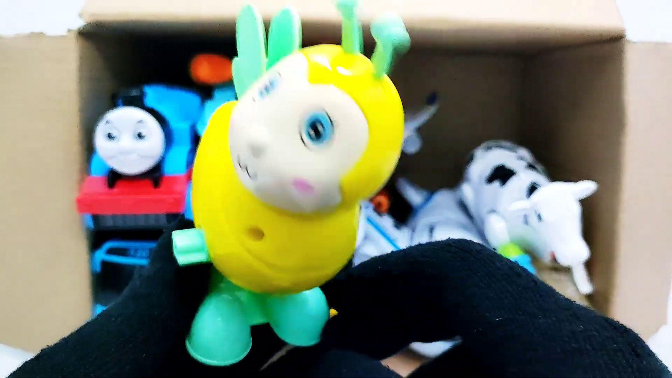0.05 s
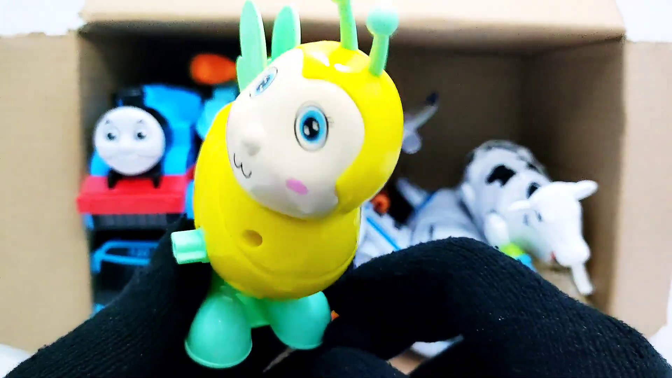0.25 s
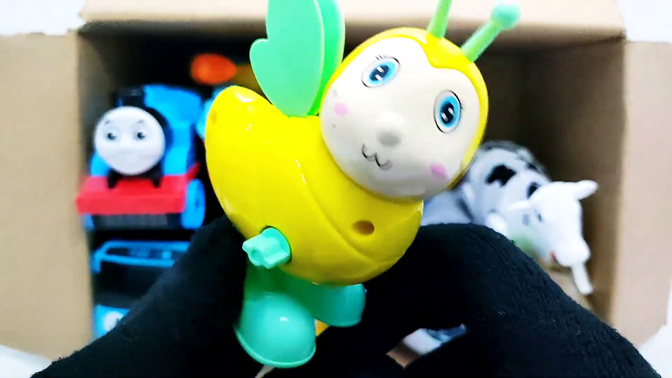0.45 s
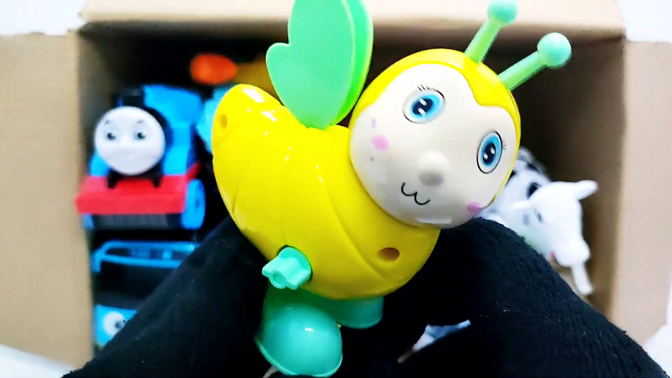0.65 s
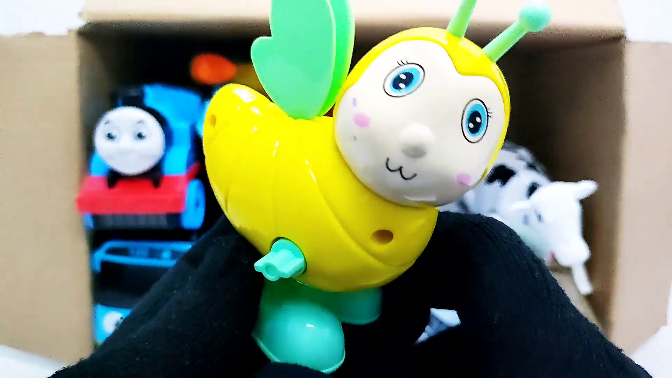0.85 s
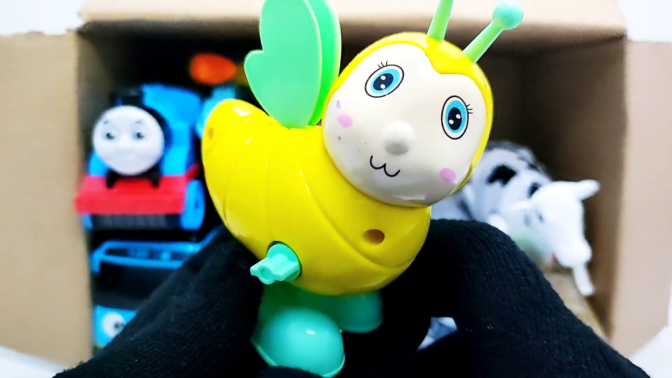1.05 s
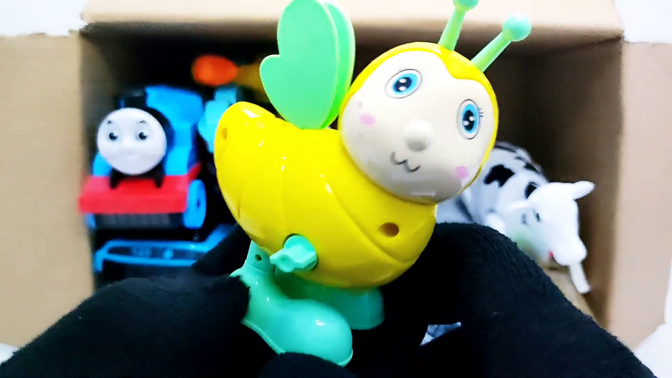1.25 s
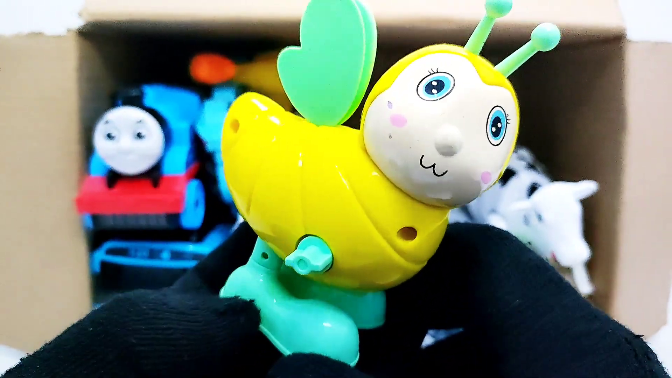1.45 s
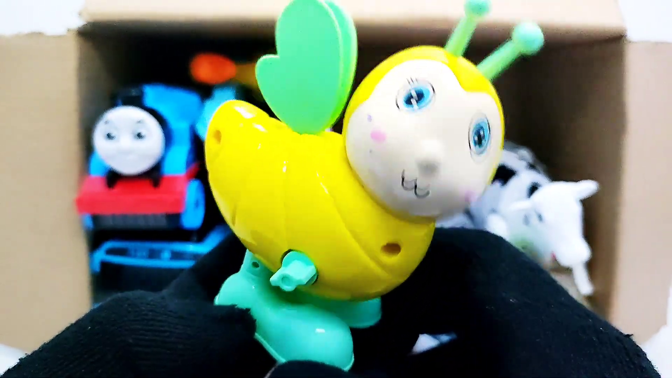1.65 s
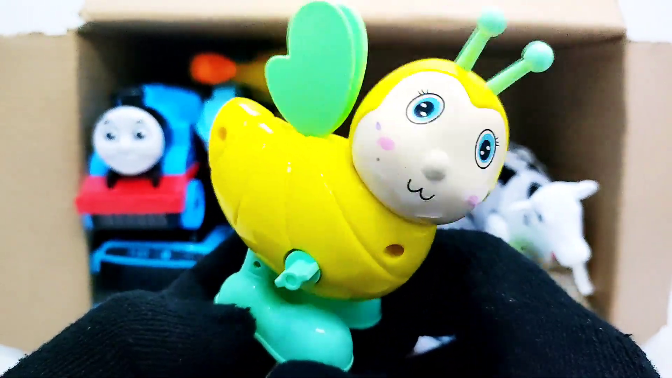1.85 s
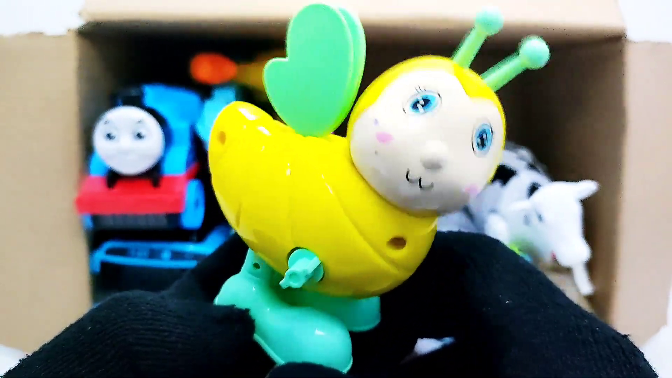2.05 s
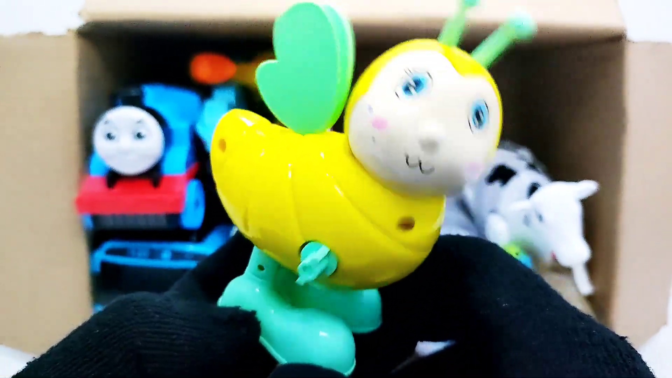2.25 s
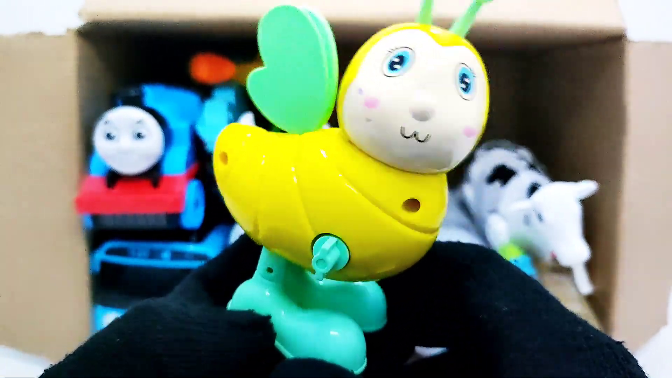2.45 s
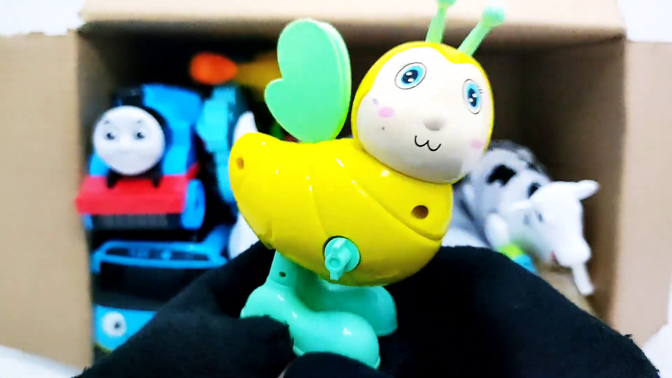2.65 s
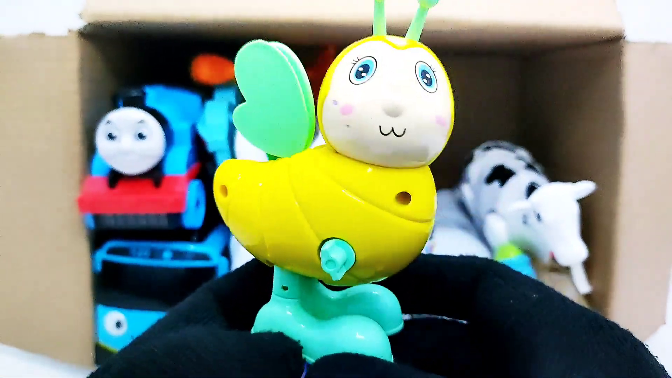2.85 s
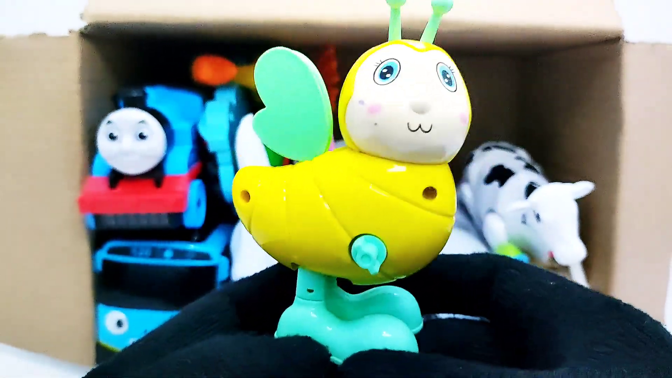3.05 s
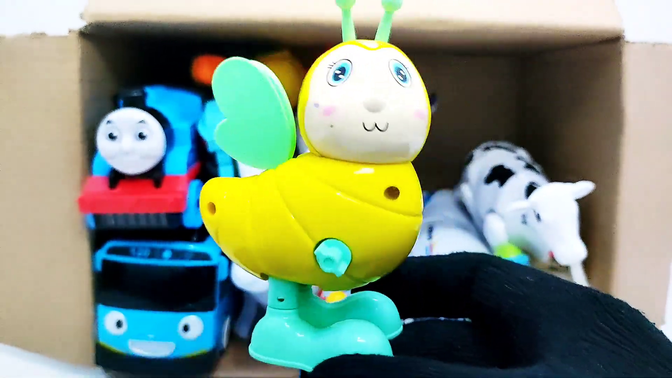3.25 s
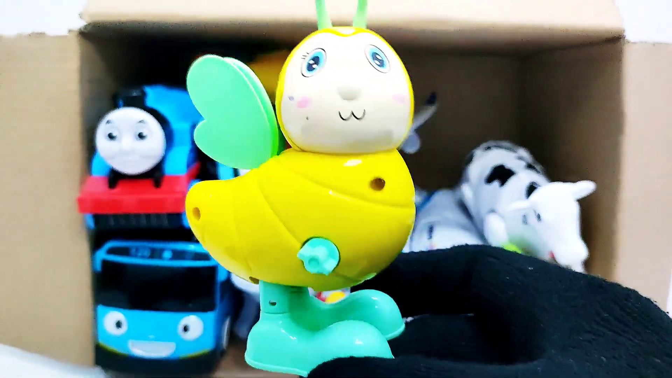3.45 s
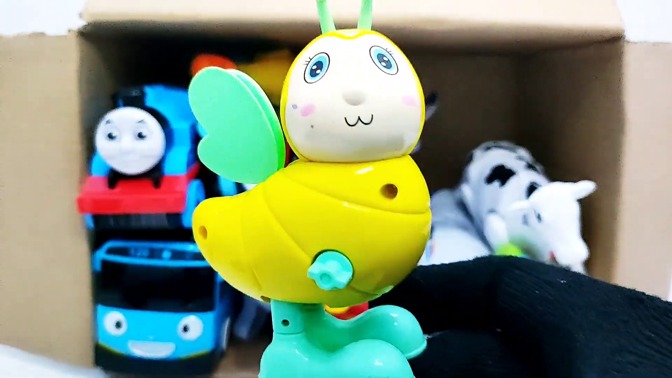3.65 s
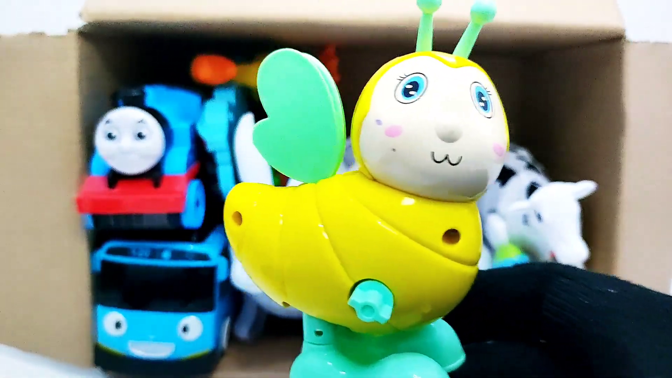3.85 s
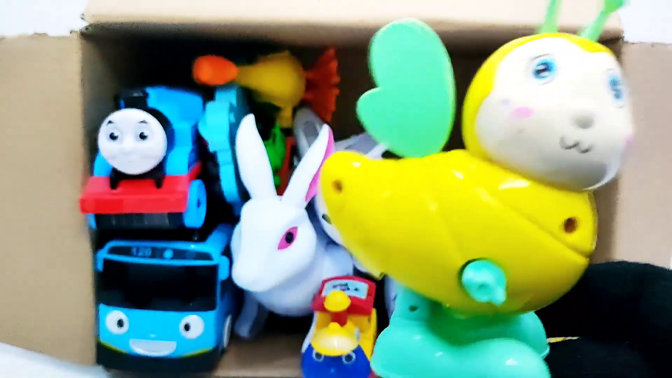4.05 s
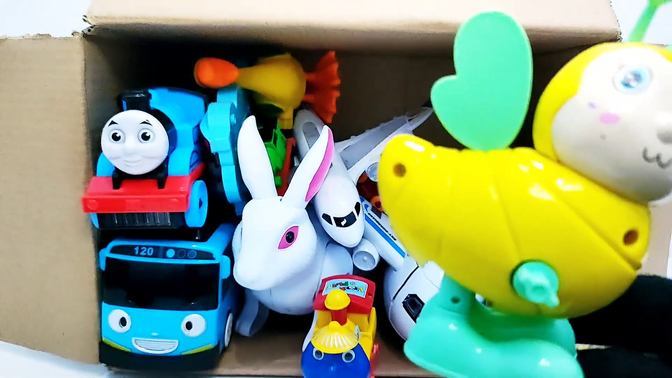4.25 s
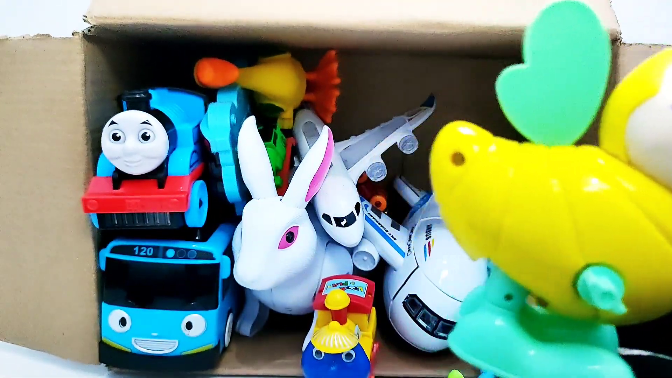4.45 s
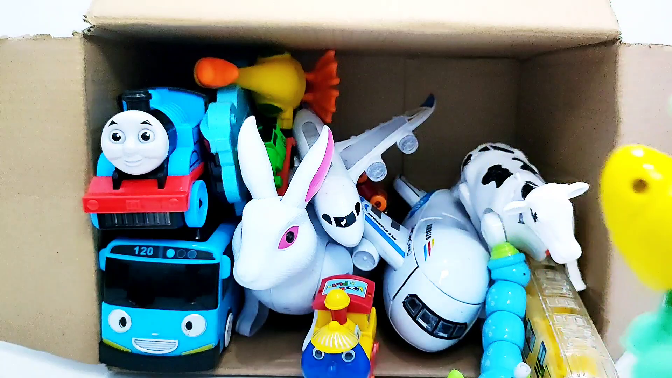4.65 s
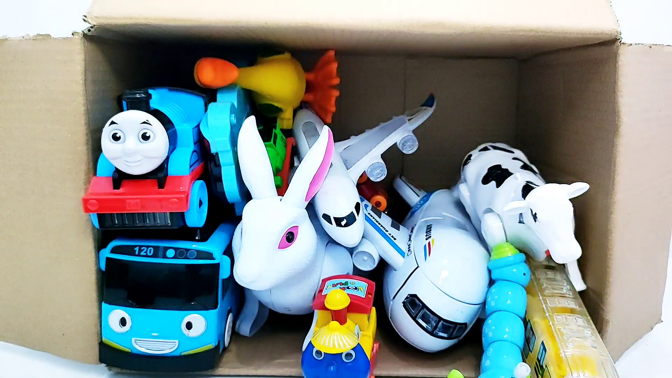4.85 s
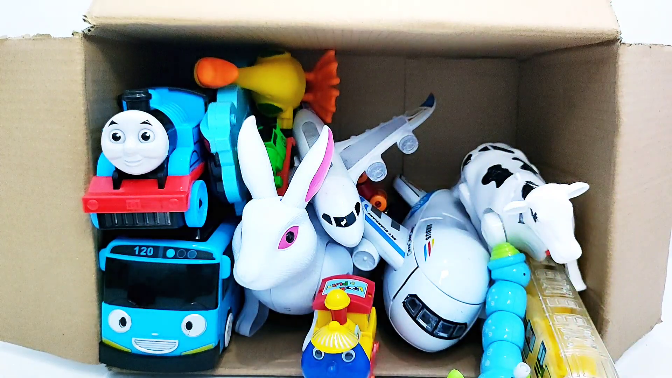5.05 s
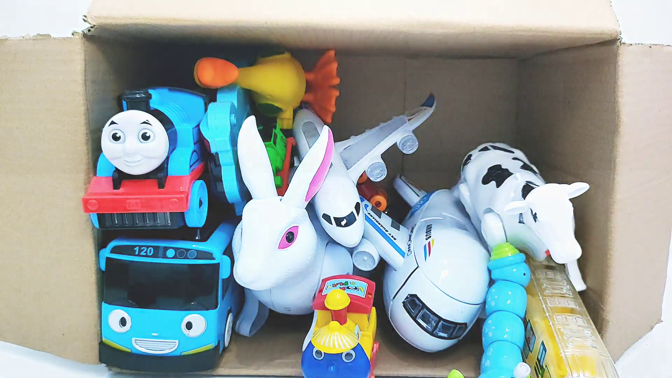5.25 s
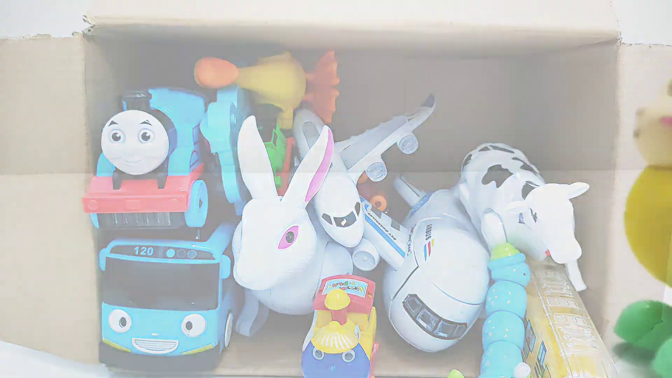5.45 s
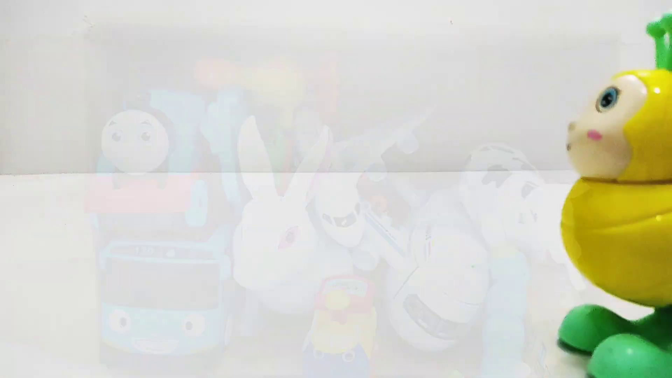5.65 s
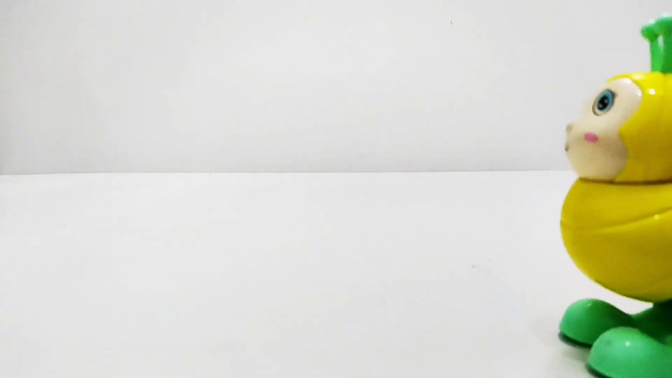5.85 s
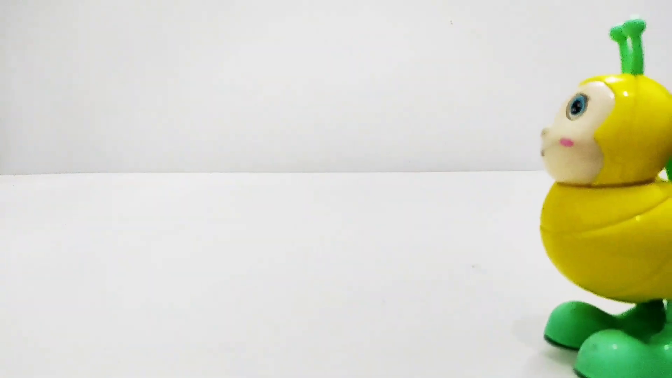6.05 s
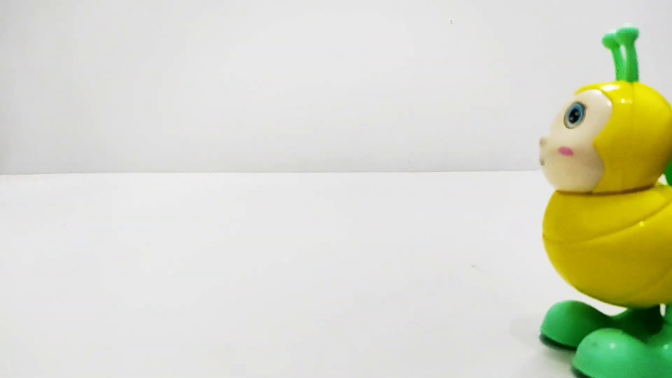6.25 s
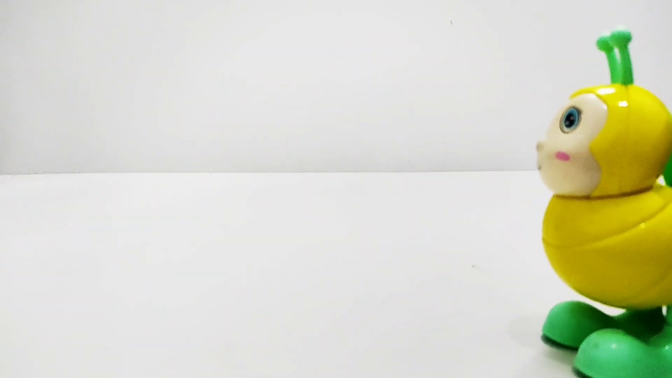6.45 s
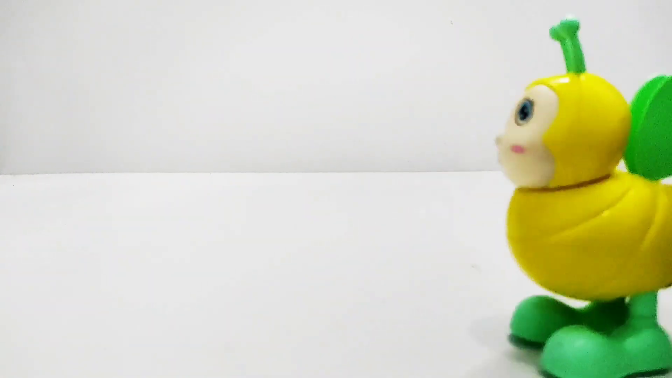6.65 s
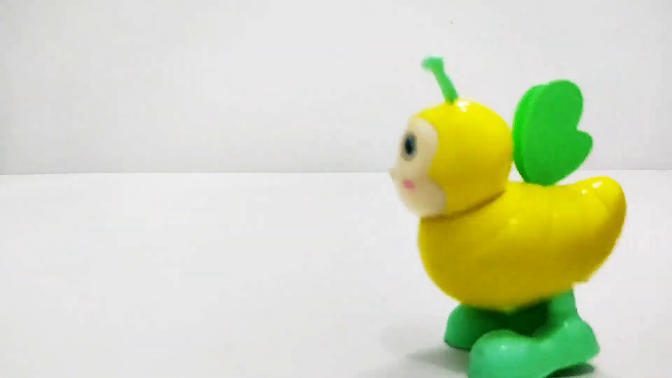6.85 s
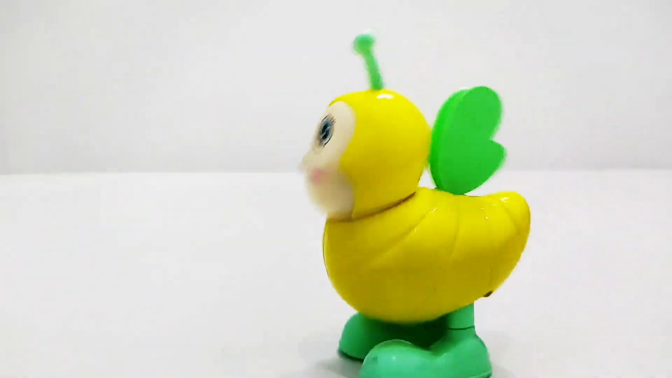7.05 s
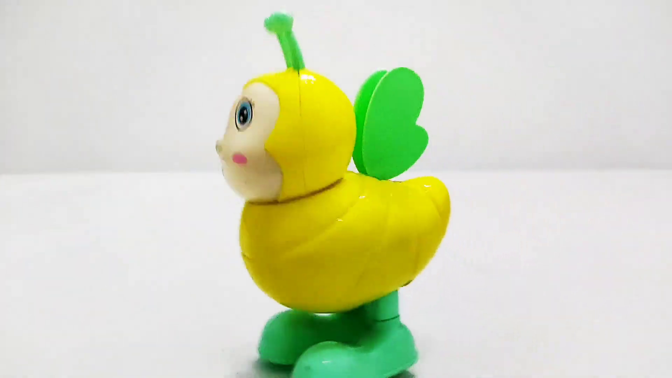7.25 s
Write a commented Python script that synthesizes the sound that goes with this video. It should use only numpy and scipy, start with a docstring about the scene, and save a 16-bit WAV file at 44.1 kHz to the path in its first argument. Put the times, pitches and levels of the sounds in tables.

```python
"""A low-humming room, then a second one fading in quieter, its air swelling at the end: a plastic wind-up toy.
Winding: paired ratchet ticks, each a burst of contacts ringing the shell modes, with glove grains.
Setting down: faint touches, rustling grains and a narrow-band foot slide.
Walking: cam and leg clacks on the shell, gear rasps over table rumble, feet as gritty scuffs plus board thuds.
Hits echo through diffuse noise tails; coloured noise makes the room beds."""
import sys
import numpy as np
from scipy import signal
from scipy.fft import rfft, irfft, next_fast_len
from scipy.io import wavfile
from scipy.ndimage import uniform_filter1d

SR = 44100
rng = np.random.default_rng(int(sys.argv[2]) if len(sys.argv) > 2 else 0)


def log_audio(samples):
    """Write samples as a 16-bit WAV file to the path given in sys.argv[1]."""
    # one column per channel
    frames = np.atleast_2d(samples).T
    # limit to full scale, then quantise
    limited = np.clip(frames, -1, 1)
    pcm = np.round(limited * 32767).astype(np.int16)
    wavfile.write(sys.argv[1], SR, pcm)


N = 321925
LEAD_SAMPLES = 4410   # kept before time zero so an earlier tick still echoes

# ratchet, first and second tick of a pair in turn:
# (time [s], peak [dB], favoured ring [Hz], high rings [dB], room send [dB])
RATCHET_TICKS = [(-0.042, -3.5, 4400, 0.5, -8.5), (0.0164, -6, 4420, 2.5, -10.5),
                 (0.1051, -7.5, 6260, -3.5, -6.5), (0.1845, -4, 4530, 2, -12.5),
                 (0.2757, -4, 4200, -1, -8.5), (0.3388, -8, 4280, 1, -10), (0.4394, -4, 4240, -1.5, -8),
                 (0.506, -6, 5540, 2, -14.5), (0.601, -5, 5500, 1.5, -9), (0.6717, -5.5, 4530, 2, -13),
                 (0.7896, -4.5, 4480, -0.5, -7.5), (0.845, -4.5, 4000, 5.5, -15.5),
                 (1.6192, -4.5, 4150, 2.5, -10.5), (1.6697, -5.5, 4420, 0, -10.5),
                 (1.7863, -3, 5530, -1.5, -8.5), (1.8523, -4, 4750, 4.5, -11.5), (1.9739, -4, 4230, 3, -9),
                 (2.0381, -5, 4500, 3.5, -13), (2.134, -2, 4100, 2.5, -8.5), (2.2034, -4, 4050, 5.5, -13.5),
                 (2.317, -2, 4770, -1.5, -8.5), (2.385, -6, 4900, 6.5, -11), (2.5006, -3, 5100, -0.2, -8.5),
                 (2.5684, -8, 5500, 4, -10), (2.6848, -5, 4900, 1, -8.5), (2.7548, -4.5, 5120, 1, -14),
                 (2.875, -4, 3910, 2.5, -7.5), (2.9432, -5, 4560, 6.5, -14.5),
                 (3.0639, -1, 4770, 1.5, -9.5), (3.1472, -7.5, 5200, 1.5, -10),
                 (3.271, -3.5, 4260, 0.5, -11), (3.33, -12.5, 4300, 3.5, -5.5), (3.467, -4.5, 4240, 1, -10),
                 (3.5257, -7, 5380, 3.5, -11), (3.6909, -6.5, 4740, 3.5, -10.5),
                 (3.7525, -7, 4640, 3.5, -13)]
# first and second tick: (low rings [dB], left-right [dB], bounces [dB])
TICK_PAIR = [(1.5, 2, -4), (0, 2.5, 2.5)]
# faint pawl after-ticks: (time [s], peak [dB], favoured ring [Hz])
PAWL_TICKS = [(0.1124, -21, 4120), (0.9395, -26, 4440), (3.298, -32, 4080), (3.4949, -16.5, 3140)]
# cam and legs, walking: (time [s], peak [dB], favoured ring [Hz])
LEG_CLACKS = [(6.689, -2.5, 3470), (6.735, -4, 2400), (6.785, -21, 4000), (6.791, -15.5, 2030),
              (6.821, -4.5, 1980), (6.861, -1, 5530), (6.908, -19, 2020), (6.922, -30, 1590),
              (6.946, 1, 4140), (6.989, -1.5, 3860), (7.03, -11, 2650), (7.035, -10, 2400),
              (7.052, -4, 1940), (7.106, -3.5, 3730), (7.153, -7, 3530), (7.157, -10, 5250),
              (7.177, -1.5, 4200), (7.233, -6.5, 3800), (7.236, -9, 3560), (7.278, -16, 2120)]
# toy touching the table: (time [s], peak [dB], favoured ring [Hz])
TABLE_TOUCHES = [(5.329, -44.5, 2560), (5.649, -45, 1970), (5.667, -39, 2900), (5.683, -33.5, 2160),
                 (5.7119, -37, 1980), (5.751, -39, 2290), (5.8609, -37, 2310), (5.894, -37.5, 2480),
                 (5.933, -37.5, 2260), (5.9555, -42, 3430), (6.225, -44, 2344), (6.24, -39, 2080),
                 (6.338, -55.5, 3530), (6.419, -56, 2300)]
# character of each hit kind:
# (low rings [dB], high rings [dB], left-right [dB], bounces [dB], room send [dB])
PAWL_CHARACTER = (6, -4, 2, 2, -4.5)
CLACK_CHARACTER = (2, 2.6, -0.8, 0.5, -12.5)
TOUCH_CHARACTER = (6.5, -1, -2, 4, -9)
# slip, snap and dying bounces in one hit: (nominal delay [s], relative level [dB])
HIT_CONTACTS = [(0, -14.5), (.0008, -4.5), (.0019, -8), (.0036, -10), (.0052, -16), (.008, -24)]
# shell modes: (nominal frequency [Hz], level in glove [dB], level on table [dB],
# t60 before contact damping [s])
SHELL_MODES = [(715, -22, -24, 0.01), (1134, -22, -11, 0.02), (1650, -13, -18, 0.0046),
               (1936, -7, -7.5, 0.02), (2320, -14, 1.5, 0.01), (2705, -8, -9, 0.034),
               (3238, -5.5, 4.5, 0.0085), (3837, 0.5, 11.5, 0.0026), (4197, -2.5, -4, 0.024),
               (4680, -0.5, 0.5, 0.01), (5100, -6, -27, 0.0094), (5563, -4.5, 1.5, 0.018),
               (6000, -28, -22, 0.003), (6835, -14.5, -9.5, 0.011), (8030, -16, -21.5, 0.0036),
               (9080, -19.5, -20, 0.018), (10000, -14, -12.5, 0.0039), (11100, -15.5, -13.5, 0.0082),
               (13440, -16.5, -19, 0.012), (15100, -26, -24, 0.01), (14400, -34, -29, .006)]
LOW_RINGS_HZ, HIGH_RINGS_HZ = 2600, 6500
# gear train: (time [s], whirr [dB], table rumble [dB])
GEAR_LEVELS = [(6.686, -100, -100), (6.69, -31, -45), (6.8, -27.5, -51.5), (7.0, -40, -47),
               (7.3, -34.5, -67)]
# gear rasp spectrum: (frequency [Hz], relative level [dB])
GEAR_SPECTRUM = [(290, -64.5), (500, -33.5), (1470, -14.5), (2330, 0), (2880, -9), (3510, 1), (5010, -9),
                 (5780, -13), (8130, -36), (11000, -26), (15000, -41)]
# table rumble spectrum: (frequency [Hz], relative level [dB])
TABLE_SPECTRUM = [(15, -23), (25, -12), (91, 0.5), (313, -7), (469, -7.5), (703, -17.5), (1040, -10),
                  (1200, -1), (1560, -24.5), (2640, -120)]
# feet landing: (time [s], scuff [dB], thud [dB])
FOOT_LANDINGS = [(6.788, -27, -35), (6.907, -32.5, -31.5), (7.037, -38, -32.5), (7.139, -39, -36),
                 (7.274, -28, -30)]
# table board modes: (nominal frequency [Hz], nominal level [dB], t60 [s])
BOARD_MODES = [(101.4, -3.5, .14), (149.3, 0, 0.078), (235, -12, 0.082), (464, -24, 0.039)]
SCUFF_RISE_S = 0.0067
# glove brushing the toy: (time [s], level [dB], hold [s])
GLOVE_STROKES = [(1.34, -58.5, .008), (4.88, -69, 0.24), (5.165, -63, 0.08), (5.31, -58.5, 0.011),
                 (5.36, -69, 0.11)]
# glove spectrum: (frequency [Hz], relative level [dB])
GLOVE_SPECTRUM = [(880, -39), (1500, -8), (2460, -2.5), (2650, -5), (3890, -4.5), (5350, -6.5), (8070, -25),
                  (14000, -27)]
# feet shuffling on the table: (time [s], level [dB], hold [s])
SHUFFLE_STROKES = [(5.5, -66, 0.13), (5.672, -55, 0.033), (5.75, -59, 0.0037), (5.786, -64, .004),
                   (5.86, -52, .06), (5.97, -68, 0.022), (6.105, -58.5, 0.027), (6.235, -61, .006),
                   (6.33, -83, .12)]
# shuffle spectrum: (frequency [Hz], relative level [dB])
SHUFFLE_SPECTRUM = [(350, -51.5), (650, -14), (900, -12.5), (1080, -3), (1350, -10), (1750, -19),
                    (2000, -3), (2290, -4.5), (2700, -5.5), (3500, -6.5), (5500, -15.5), (8500, -32),
                    (13000, -36), (15500, -56)]
# foot sliding onto the table: (time [s], level [dB], hold [s])
SLIDE_STROKES = [(5.53, -62, .07)]
# slide ring spectrum: (frequency [Hz], relative level [dB])
SLIDE_SPECTRUM = [(2000, -41.5), (2600, -23), (2800, -2.5), (2950, -4), (3100, -17), (3280, -2),
                  (3500, -28), (4500, -53)]
# echo decay: (frequency [Hz], t60 [s])
ECHO_T60 = [(300, 0.71), (1000, 0.47), (2000, 0.85), (5000, 0.49), (9000, 1), (15000, 0.091)]
ECHO_CLUMPS_DB = 4.5
# first room, fading out: (time [s], level [dB])
HUM_LEVEL = [(0.0, -43), (0.48, -46), (2.92, -45.5), (3.5, -42), (3.85, -44.5), (4.98, -46), (5.6, -56),
             (6.6, -75.5)]
# first room spectrum: (frequency [Hz], relative level [dB])
HUM_SPECTRUM = [(12, -31), (22, -4.5), (45, 0.5), (70, -9), (100, -13), (135, -8), (157, -0.5), (200, -4),
                (250, -7), (315, -2), (400, -11), (895, -19.5), (1600, -27), (3410, -33.5), (6150, -43),
                (7000, -54), (12000, -61), (16000, -88.5)]
# second room, fading in: (time [s], level [dB])
AIR_LEVEL = [(5.0, -88.5), (5.8, -58), (6.4, -66.5), (6.6, -67.5), (7.3, -47.5)]
# second room spectrum: (frequency [Hz], relative level [dB])
AIR_SPECTRUM = [(12, -36), (20, -0.5), (50, 3.5), (120, -15), (166, -3.5), (261, -14), (324, -9),
                (632, -23), (2280, -23.5), (6840, -37), (12000, -43.5), (15600, -75), (22000, -120)]
# left-right likeness of both room beds: (frequency [Hz], likeness [-1..1])
ROOM_LIKENESS = [(30, .9), (150, 0.99), (300, 1), (600, 0.38), (1500, 0.037), (8000, .05)]
# microphone colour: (frequency [Hz], left minus right [dB])
MIC_BALANCE = [(100, 0.6), (1000, 1), (4000, -0.6), (8000, 2), (13000, 4)]
CUTOFF_HZ = 16500


def winding_ticks():
    """Winding clicks the pawl in unlike pairs, with faint after-ticks; returns full hit rows."""
    rows = [(*row, *PAWL_CHARACTER) for row in PAWL_TICKS]
    for k, (s, peak_db, top_hz, high_db, room_db) in enumerate(RATCHET_TICKS):
        low_db, pan_db, bounce_db = TICK_PAIR[k % 2]
        rows.append((s, peak_db, top_hz, low_db, high_db, pan_db, bounce_db, room_db))
    return rows


def shell_hits(events, on_table, left_lag_samples, favour_db, uneven_db, apart_rad):
    """Each contact re-excites all shell modes at new strengths; returns direct sound and room send."""
    out = np.zeros((2, 2, LEAD_SAMPLES + N + 4000))
    t = np.arange(1200) / SR
    hz, held_db, table_db, t60_s = np.transpose(SHELL_MODES)
    arrival_s = np.array([[left_lag_samples], [-left_lag_samples]]) / 2 / SR + 2e-4
    high = hz > HIGH_RINGS_HZ
    for s, peak_db, top_hz, low_db, high_db, pan_db, bounce_db, room_db in events:
        level_db = table_db if on_table else held_db
        level_db = level_db + low_db * (hz < LOW_RINGS_HZ) + high_db * high
        level_db = level_db + favour_db * np.exp(-(np.log(hz / top_hz) / 0.11) ** 2)
        hit, all_round = np.zeros((2, 2, len(t)))
        for k, (delay_s, contact_db) in enumerate(HIT_CONTACTS):
            start_s = abs(delay_s) * rng.uniform(.8, 1.2) + arrival_s
            age = np.maximum(t - start_s, 0)[:, :, None]
            bounce = bounce_db * (k > 1)
            strength = amp(contact_db + bounce + level_db + rng.normal(0, uneven_db, len(hz)))
            pitch_hz = hz * (1 + rng.normal(0, 0.031, len(hz)))
            # short waves radiate unevenly: sides agree less in the treble
            side_phase = apart_rad * (1 + hz / 12000) * rng.standard_normal((2, 1, len(hz)))
            phase = rng.normal(0, 0.61, len(hz)) + side_phase
            # gradual contact; parts still touching damp the ring
            swell = (1 - np.exp(-age * 4000)) * np.exp(-age * 480)
            rings = swell * amp(-60 * age / t60_s) * np.sin(2 * np.pi * pitch_hz * age + phase)
            hit += rings @ strength
            # over all directions the rings blur into a broader colour
            all_round += (rings * np.exp(-age * 700)) @ amp(contact_db + level_db)
        hit *= amp(peak_db) / np.abs(hit).max(axis=1).mean()
        hit *= amp([[pan_db / 2], [-pan_db / 2]])
        send = amp(room_db) * np.sqrt(np.sum(hit ** 2) / np.sum(all_round ** 2))
        at = LEAD_SAMPLES + round((s - 9e-4) * SR)
        out[0, :, at:at + len(t)] += hit
        out[1, :, at:at + len(t)] += all_round * send
    return out[..., :LEAD_SAMPLES + N]


def gears():
    """Small teeth mesh unevenly as short noise rasps; the table carries a low shake."""
    whirr_db, table_db = in_time(GEAR_LEVELS)
    shake = rng.standard_normal(N) + .3 * rng.standard_normal((2, N))
    tooth_power = uniform_filter1d(grains(300, 3.0)[:1] ** 2, size=60)
    teeth = np.abs(tooth_power) ** .5 * rng.standard_normal((2, N))
    whirr = amp(whirr_db) * coloured(teeth, GEAR_SPECTRUM)
    return whirr + amp(table_db) * coloured(shake, TABLE_SPECTRUM)


def footsteps():
    """A flat foot scuffs down in a gritty burst and excites the board modes."""
    scuff, thud, t = np.zeros(N), np.zeros(N), np.arange(N) / SR
    for s, scuff_db, thud_db in FOOT_LANDINGS:
        rise = np.maximum(t - s + 0.0032, 0) / SCUFF_RISE_S
        scuff += amp(scuff_db) * rise * np.exp(1 - rise)
        age = np.maximum(t - s, 0)
        for hz, mode_db, t60_s in BOARD_MODES:
            decay = amp(thud_db + mode_db + rng.normal(0, 2.3) - 60 * age / t60_s)
            ring = np.sin(2 * np.pi * hz * rng.uniform(0.84, 1.385) * age)
            thud += decay * ring * (1 - np.exp(-age * 250))
    band = signal.butter(2, [300, 2200], "band", fs=SR, output="sos")
    return scuff * rms_one(signal.sosfilt(band, grains(2500, 2.4))) + thud


def rustle():
    """Fabric and plastic brush in dense fine grains; the sliding foot rubs a narrow ring."""
    glove = strokes(GLOVE_STROKES, rise_db_per_s=400, fall_db_per_s=300)
    slide = strokes(SLIDE_STROKES, rise_db_per_s=123, fall_db_per_s=150)
    shuffle = strokes(SHUFFLE_STROKES, rise_db_per_s=400, fall_db_per_s=302)
    glove = glove * coloured(grains(2500, 2.3), GLOVE_SPECTRUM)
    slide = slide * coloured(grains(2000, 4.0), SLIDE_SPECTRUM)
    return glove + slide + shuffle * coloured(grains(1500, 1.7), SHUFFLE_SPECTRUM)


def room_echo(x, build_up_s):
    """Diffuse echoes: noise bands decay at their own rates, independent left and right."""
    t = np.arange(SR * 3 // 4) / SR
    tail, edges_hz = 0, 120 * 2 ** np.arange(8)
    tops_hz = edges_hz[1:] * 1.3 ** (edges_hz[1:] > 10000)   # octaves, the last one wider
    for low_hz, high_hz in zip(edges_hz, tops_hz):
        band = signal.butter(2, [low_hz, high_hz], "band", fs=SR, output="sos")
        noise = signal.sosfilt(band, rng.standard_normal((2, len(t))))
        tail = tail + noise * amp(-60 * t / at_hz(ECHO_T60, np.sqrt(low_hz * high_hz)))
    tail = tail * (1 - np.exp(-(t / build_up_s) ** 4))
    # early echoes arrive in clumps
    clumps = np.interp(t, t[::150], rng.standard_normal(len(t[::150])))
    tail = tail * amp(ECHO_CLUMPS_DB * clumps * np.exp(-t / 0.14))
    tail = tail / np.sqrt(np.sum(tail ** 2) / 2)
    return signal.fftconvolve(x, tail, axes=1)[:, :x.shape[1]]


def room_bed(level, spectrum, left_lag_samples):
    """Ventilation and distant rumble: coloured noise, alike on both sides in the bass."""
    size, hz = fft_grid()
    alike = np.clip(at_hz(ROOM_LIKENESS, hz), 0, 1)
    mid, side = rfft(rng.standard_normal((2, size)))
    pair = np.sqrt(1 + alike) * mid + np.sqrt(1 - alike) * side * [[1], [-1]]
    pair[0] *= np.exp(-2j * np.pi * hz * left_lag_samples / SR)
    return amp(in_time(level)[0]) * coloured(irfft(pair, size)[:, :N], spectrum)


def strokes(rows, rise_db_per_s, fall_db_per_s):
    """Gain of brushing strokes: each swells to its level, holds and dies away."""
    t = np.arange(N) / SR
    gain = 0
    for s, db, hold_s in rows:
        rise_db = rise_db_per_s * np.maximum(s - t, 0)
        fall_db = fall_db_per_s * np.maximum(t - s - hold_s, 0)
        gain = gain + amp(db - rise_db - fall_db)
    return gain


def grains(per_s, spread_db):
    """Random clicks of uneven size, partly shared by the two sides; per_s is the rate of each layer."""
    sizes = amp(spread_db * np.minimum(rng.exponential(1, (3, N)), 5))
    sizes = sizes * rng.choice([-1, 1], (3, N))
    clicks = sizes * (rng.random((3, N)) < per_s / SR)
    return clicks[0] + clicks[1:]


def coloured(x, spectrum):
    """Filter by a spectrum in dB, then scale to rms 1."""
    size, hz = fft_grid()
    return rms_one(irfft(rfft(x, size) * amp(at_hz(spectrum, hz)), size)[..., :N])


def fft_grid():
    """FFT size and bin frequencies in Hz."""
    size = next_fast_len(N)
    return size, np.arange(size // 2 + 1) * SR / size


def at_hz(points, hz):
    """Read a table on a log-frequency axis."""
    table_hz, values = np.array(points)[:, 0], np.array(points)[:, 1]
    return np.interp(np.log(np.maximum(hz, 1)), np.log(table_hz), values)


def in_time(rows):
    """Per-sample curves: -120 dB outside their span, but a curve ending after 7 s holds its last value."""
    s, *columns = np.transpose(rows)
    t = np.arange(N) / SR
    return [np.interp(t, s, c, left=-120, right=c[-1] if s[-1] > 7 else -120) for c in columns]


def amp(db):
    """Decibels to gain."""
    return 10 ** (np.asarray(db) / 20)


def rms_one(x):
    """Scale to rms 1."""
    return x / np.sqrt(np.mean(x ** 2) + 1e-20)


def scene():
    """Winding, setting down and walking; the toy rocks between ticks, so neighbours echo differently."""
    wound = winding_ticks()
    standing = [(*row, *CLACK_CHARACTER) for row in LEG_CLACKS]
    standing += [(*row, *TOUCH_CHARACTER) for row in TABLE_TOUCHES]
    hits = [shell_hits(wound[k::3], False, left_lag_samples=-8.0, favour_db=4.5, uneven_db=3,
                       apart_rad=0.69) for k in range(3)]
    hits.append(shell_hits(standing, True, left_lag_samples=3.22, favour_db=5.5, uneven_db=1.5,
                           apart_rad=0.89))
    toy = sum(near + room_echo(far, build_up_s=.008) for near, far in hits)[:, LEAD_SAMPLES:]
    hum = room_bed(HUM_LEVEL, HUM_SPECTRUM, left_lag_samples=11.0)
    air = room_bed(AIR_LEVEL, AIR_SPECTRUM, left_lag_samples=3.0)
    return toy + gears() + footsteps() + rustle() + hum + air


def record(dry):
    """Two microphones differ in colour; peaks clip at full scale, then the top is cut."""
    size, hz = fft_grid()
    half_db = at_hz(MIC_BALANCE, hz) / 2
    heard = irfft(rfft(dry, size) * amp([half_db, -half_db]), size)[:, :N]
    top_cut = signal.cheby2(12, 60, CUTOFF_HZ, fs=SR, output="sos")
    return signal.sosfilt(top_cut, np.clip(heard, -1, 1))


dry = scene()
out = record(dry)
log_audio(out)
```